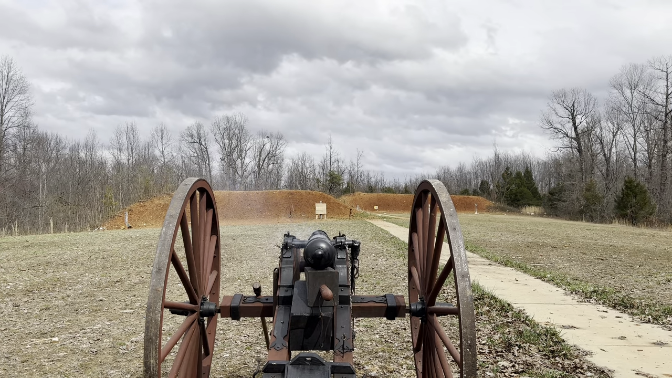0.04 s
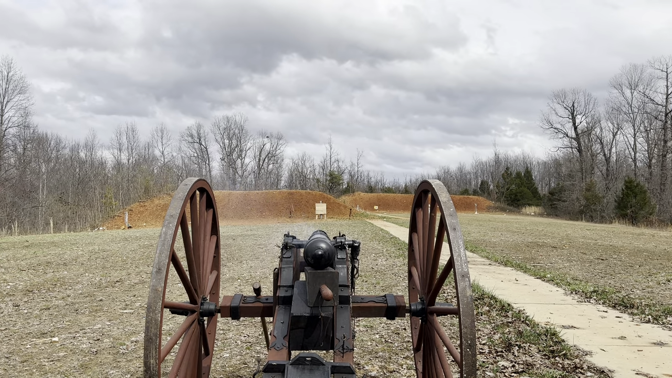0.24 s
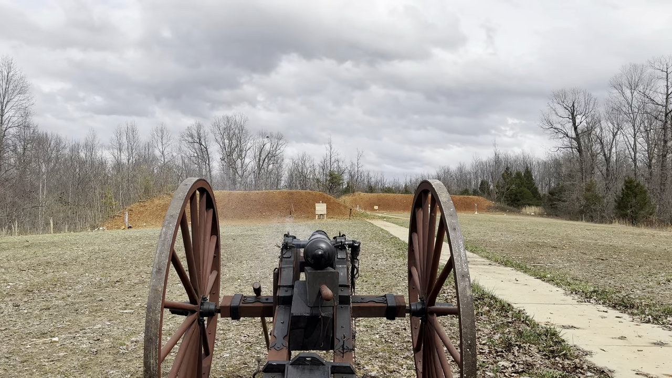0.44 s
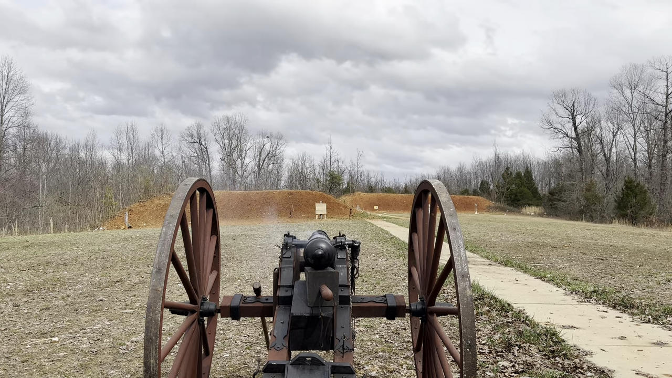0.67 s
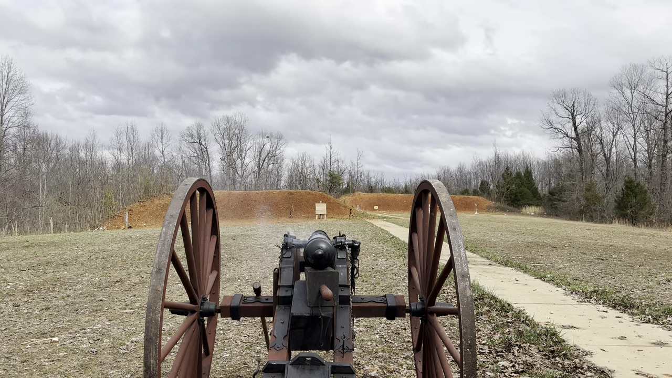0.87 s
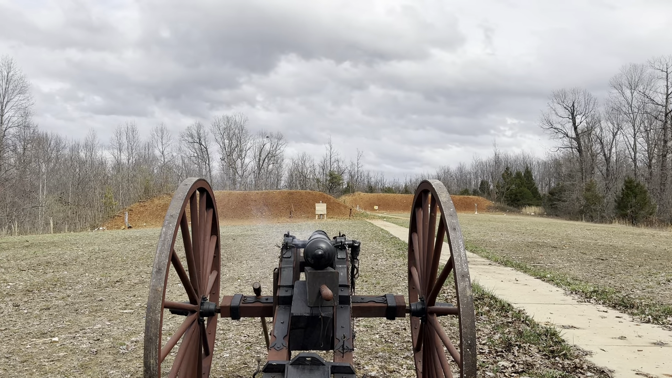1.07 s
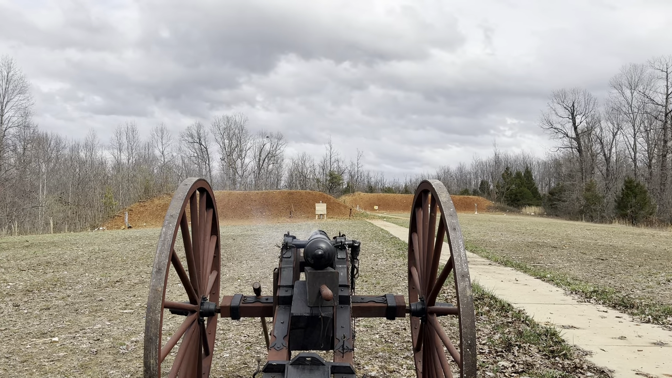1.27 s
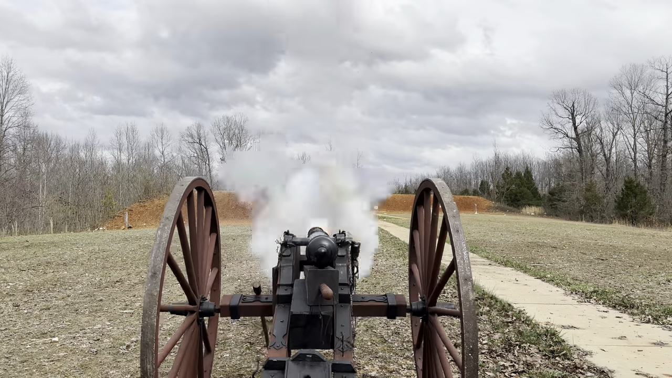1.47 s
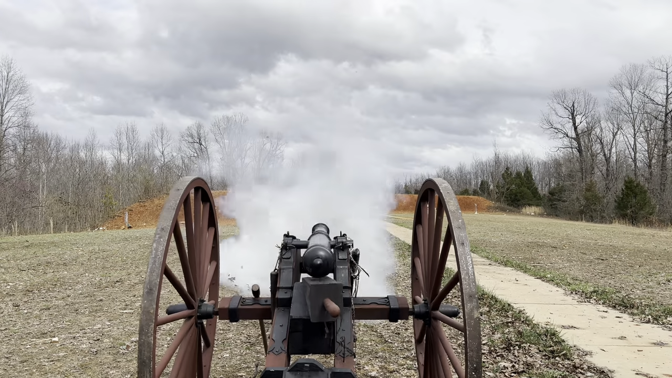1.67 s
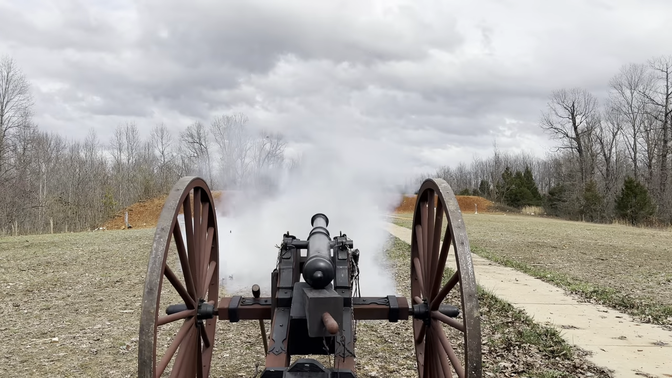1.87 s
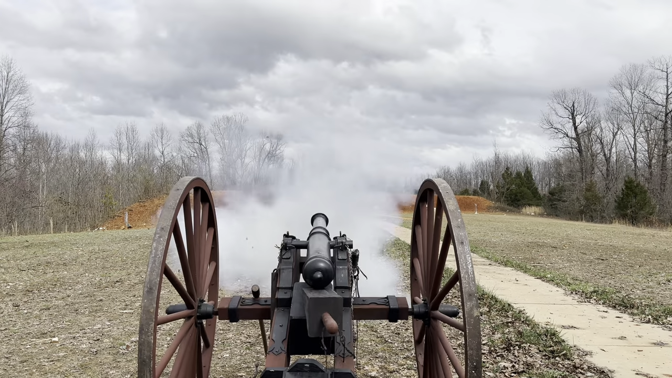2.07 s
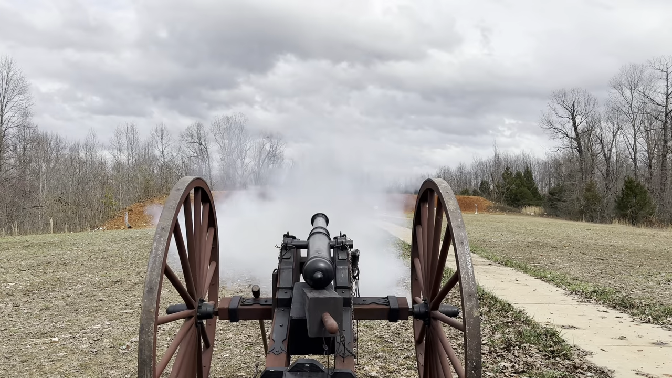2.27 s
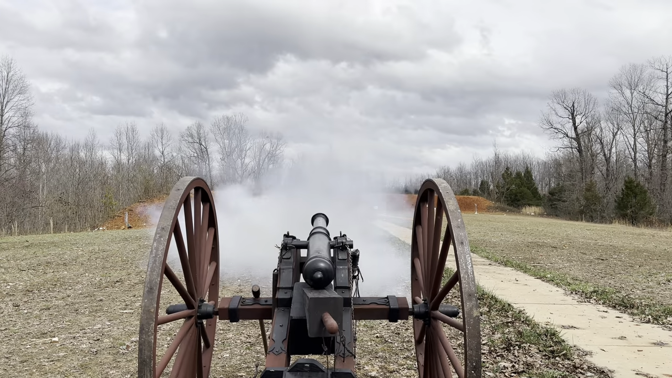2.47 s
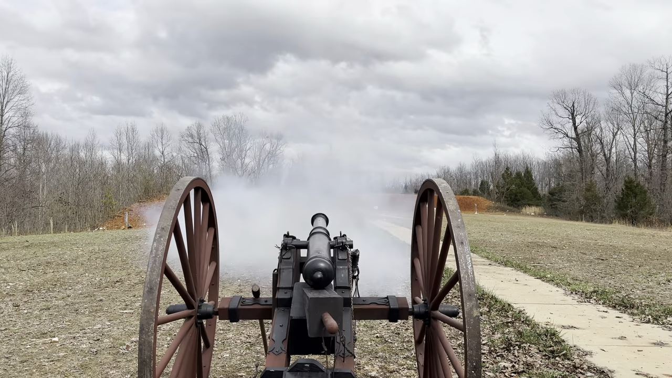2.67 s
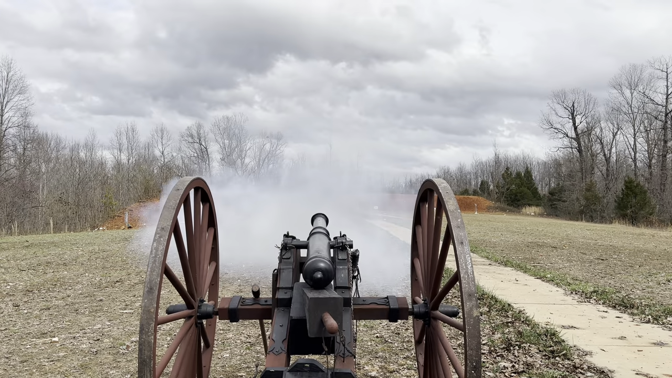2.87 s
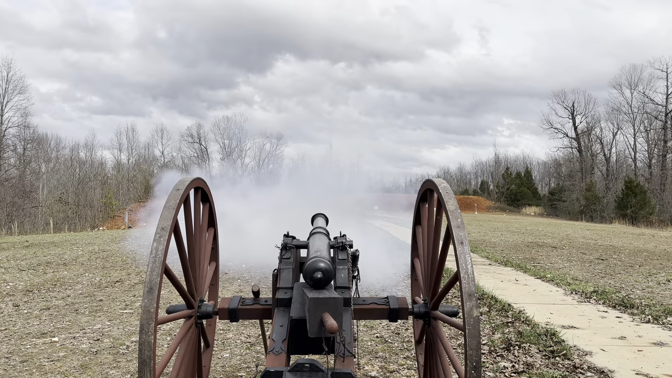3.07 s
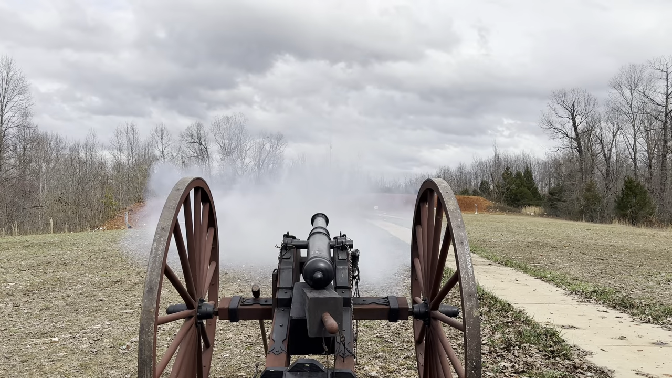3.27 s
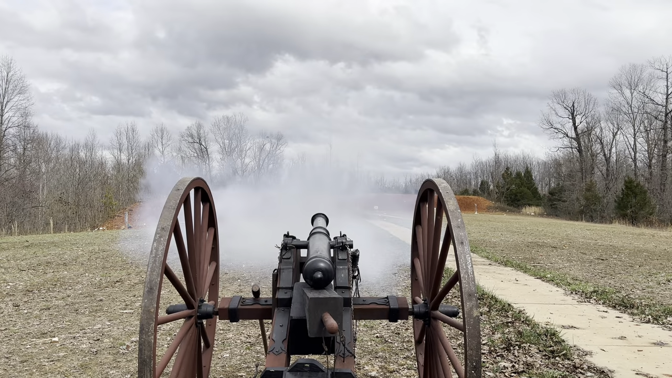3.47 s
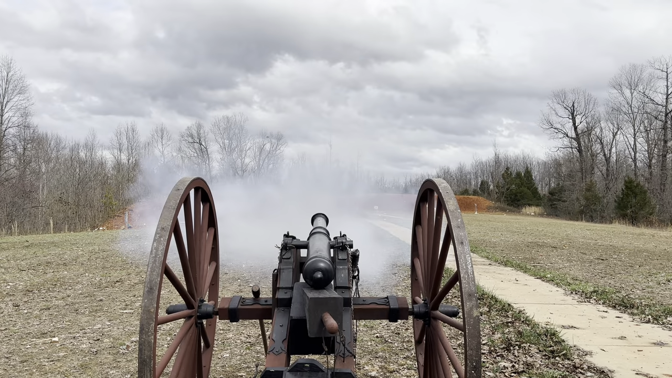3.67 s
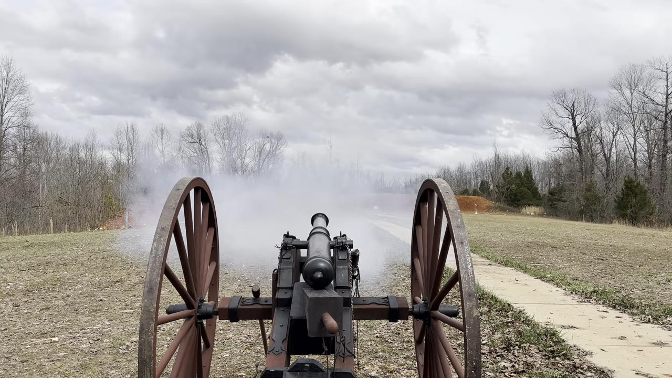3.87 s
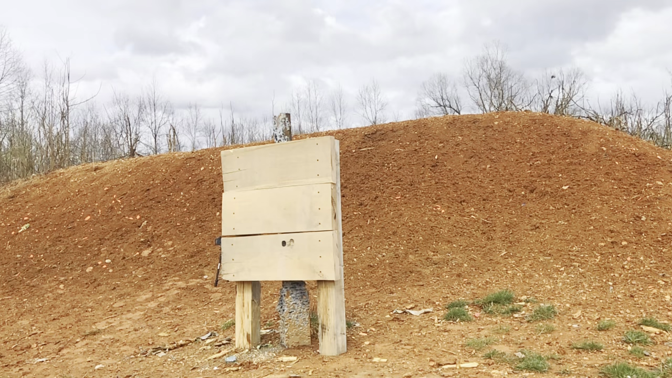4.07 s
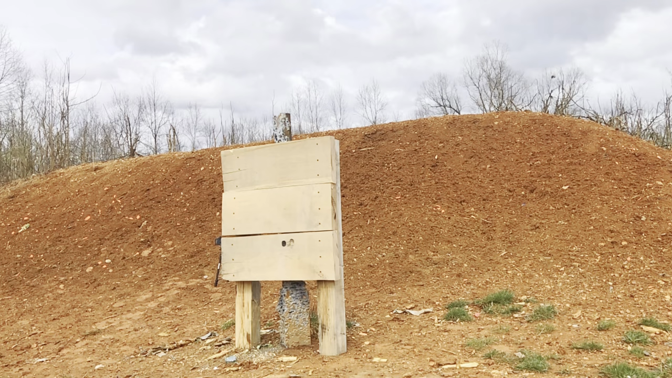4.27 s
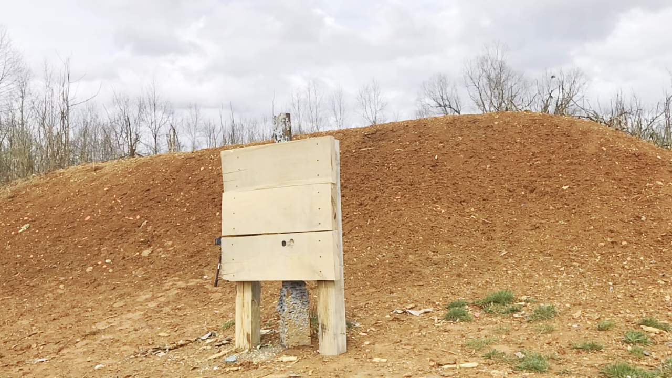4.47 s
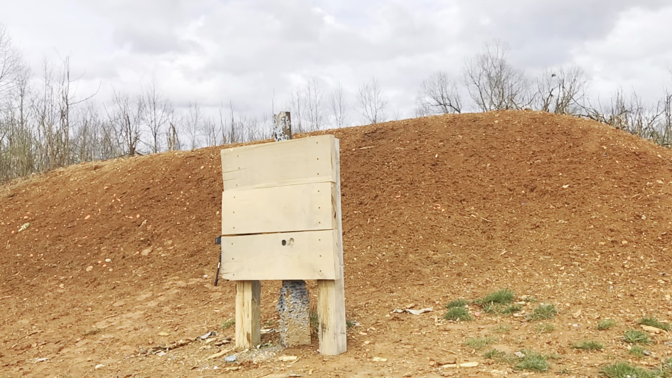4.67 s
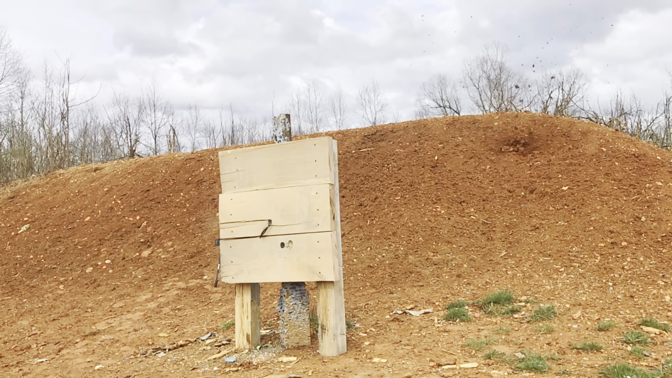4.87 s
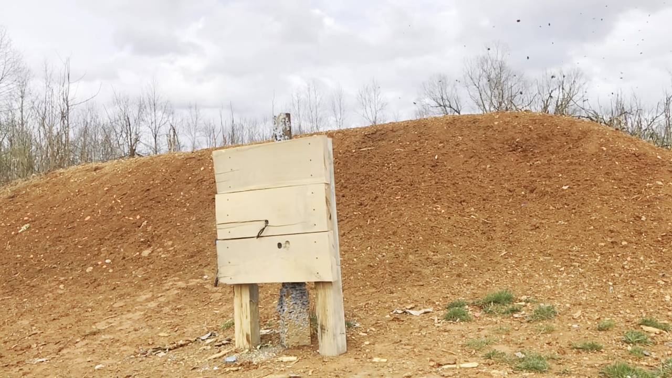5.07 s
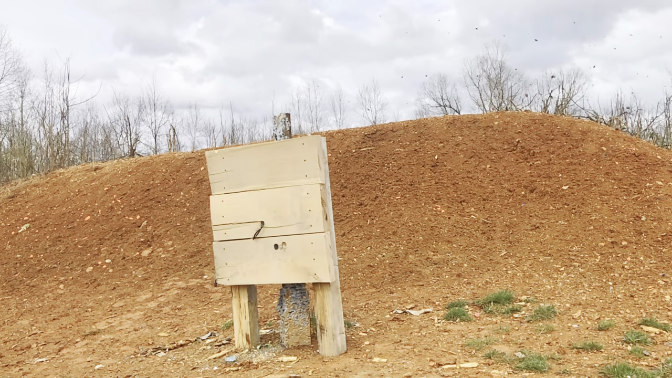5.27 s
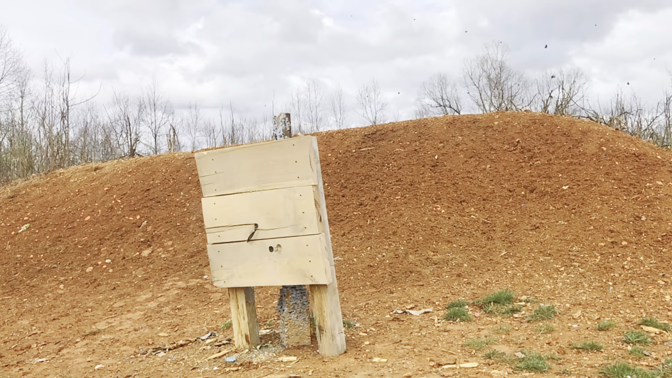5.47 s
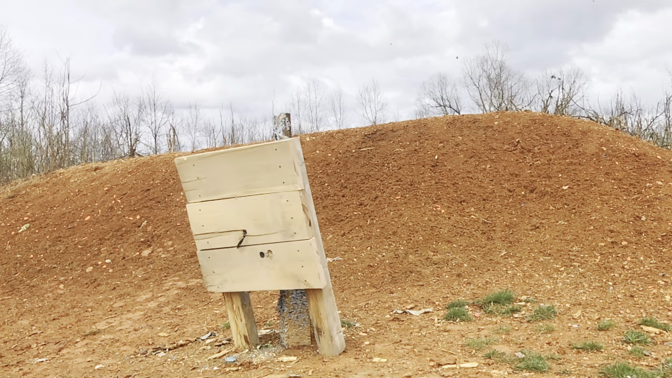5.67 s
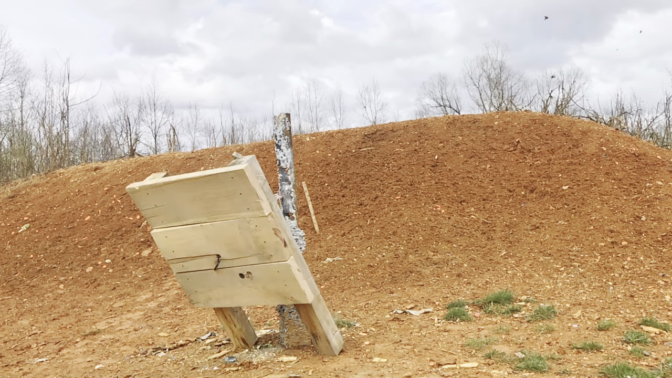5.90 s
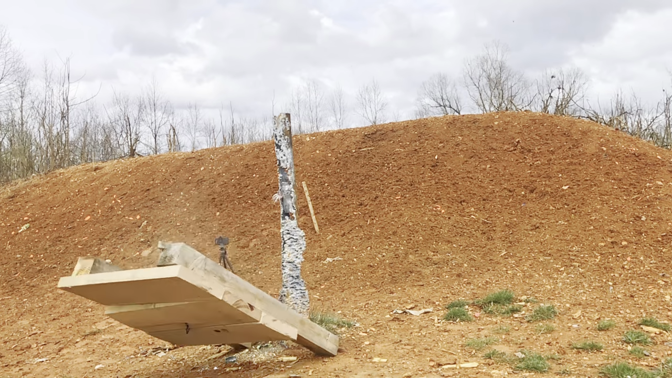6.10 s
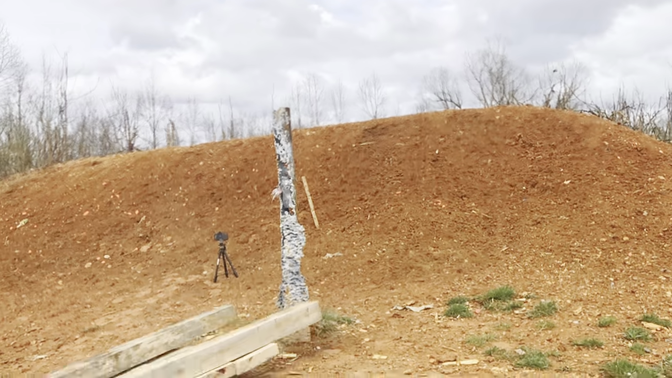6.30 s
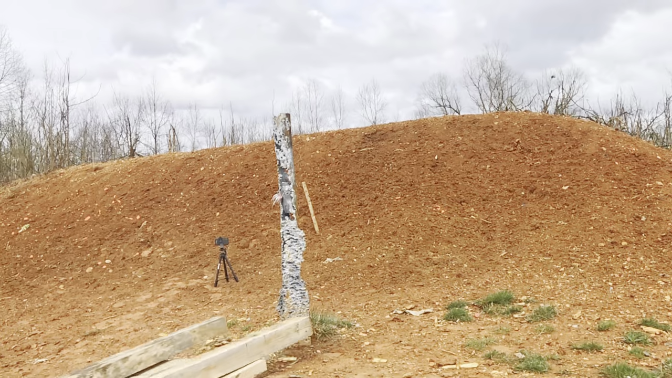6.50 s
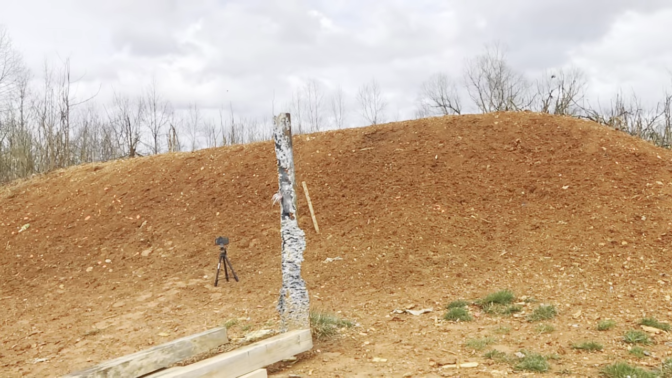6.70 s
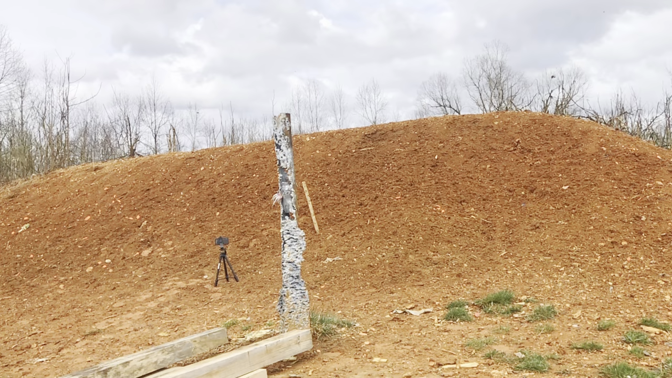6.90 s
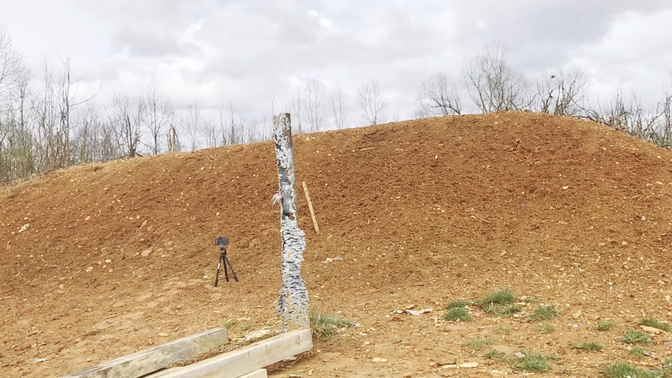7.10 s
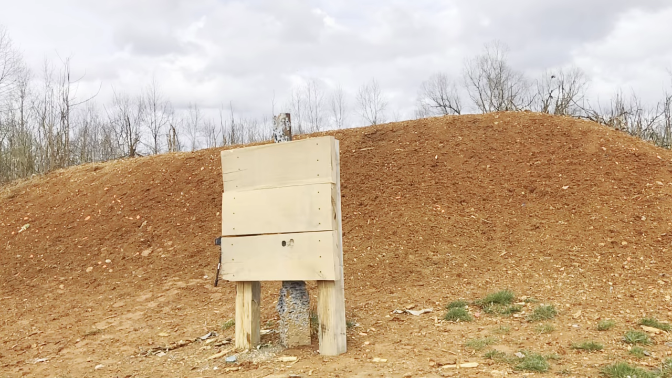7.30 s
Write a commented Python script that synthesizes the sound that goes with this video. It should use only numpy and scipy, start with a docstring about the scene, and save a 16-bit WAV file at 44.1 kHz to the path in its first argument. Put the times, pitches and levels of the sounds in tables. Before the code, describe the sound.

From 0 to 1.4 s, a stereo microphone behind a cannon in an open field catches crisp dry leaves, twig snaps, soft wind bumps and thin rising notes from a far bird around 0.2-0.4 s. At 1.41 s gas spits, and within hundredths of a second a huge, saturated blast follows, cracking then deep. Separate slaps return at about 1.67, 1.77, 1.95 and 2.2 s within a wide, rolling echo that grows duller; a weak late return comes near 3.25 s, wind bumps near 3.7. A click at 4.0 s cuts to quiet mono air beside a plank target. At 4.65 s a sharp double boom arrives, a ball hisses and whistles downward, and wood smacks loudly at 4.8. A return thumps at 5.0 and the echo fades. At 6.24-6.36 s the target crashes down in rapid wooden knocks, bouncing at 6.5-6.66. Dust and soil tick until 7.24, then faint hush.

```python
"""First, in stereo behind a black powder cannon: dry leaves and twigs underfoot, a far bird, wind.
The gun fires: puffs of gas are grainy noise, the blast is a row of dying swings, the echo is fading noise.
Then, after a click, the same shot in mono beside a plank target at an earth bank: the boom, then the ball's hiss.
The planks ring when struck and the echo fades. The target topples and bounces with more knocks,
dust and soil patter down as noise and small ticks, and a faint hush ends it."""
import sys
import numpy as np
from scipy import signal
from scipy.io import wavfile
from scipy.ndimage import uniform_filter1d

SR = 44100
rng = np.random.default_rng(int(sys.argv[2]) if len(sys.argv) > 2 else 0)


def gain_from_db(level_db):
    """Turn a decibel level (scalar or array-like) into a linear amplitude factor."""
    decades = np.asarray(level_db, float) / 20
    return 10 ** decades


def master_out(mix):
    """Clip the mix to full scale and print it as 16-bit PCM to the path in sys.argv[1]."""
    frames = np.transpose(np.atleast_2d(mix))
    ceiling = np.clip(frames, -1, 1)
    pcm = np.round(ceiling * 32767).astype(np.int16)
    wavfile.write(sys.argv[1], SR, pcm)


N = 324028
T = np.arange(N) / SR
CUT_S, END_S = 4.002, 7.24  # start of the target side, start of the last hush

# All levels are settings of the single layers, before they are mixed and rounded off.
# Colours of the noises: (pitch [Hz], level [dB])
ECHO_GUN_COLOUR = [(25, -21.5), (50, -9.5), (240, -2.5), (560, -12.5), (2100, -20), (9500, -31),
                   (15000, -47.5), (16000, -72)]
ECHO_BANK_COLOUR = [(25, -28.5), (60, -19.5), (150, 2.5), (500, -5), (1500, -11.5), (6200, -20.5),
                    (12500, -39), (16000, -58.5)]
GAS_COLOUR = [(150, -23), (400, -3.5), (1300, -0.5), (5500, -10), (16000, -25.5)]
BALL_COLOUR = [(100, -20.5), (300, 0.5), (900, -5.5), (1700, -9.5), (12200, -10), (16000, -31)]
WIND_COLOUR = [(15, -42.5), (25, -13), (55, 6), (100, -4), (170, -14.5), (420, -43), (1100, -100)]
LEAF_COLOUR = [(400, -6.5), (2400, -8.5), (6500, 2), (10000, -9.5), (16000, -22)]
FIELD_COLOUR = [(90, -18), (150, -3.5), (300, -17.5), (540, -31.5), (3400, -26), (8000, -32.5),
                (10000, -24), (16000, -37.5)]
BANK_COLOUR = [(20, -20.5), (84, 11), (230, 2), (600, -13), (1400, -21.5), (12500, -29.5), (16000, -32)]
# Stereo width of noise: (pitch [Hz], side minus mid [dB])
SIDE_DB = [(60, -9), (200, -11.5), (700, 3.5), (2380, -1.5), (8000, 1.5), (15000, -16)]

FIELD_DB, BANK_DB, HUSH_DB = -65.5, -63, -84
WIND_DB = -58.5  # the steady part
# Gusts on the microphone: (time [s], length [s], level [dB])
GUSTS = [(0.153, 0.049, -33.5), (0.218, 0.066, -40.5), (0.828, 0.16, -49), (1.199, 0.27, -58),
         (3.691, 0.1, -36), (3.78, 0.21, -43)]
# Steps in dry leaves: (time [s], length [s], crackle level [dB], heel crunch level [dB])
LEAVES = [(0, 0.085, -56.5, -69), (0.055, 0.081, -56.5, -58), (0.08, 0.44, -65, -69),
          (0.451, 0.072, -62, -62), (0.509, 0.044, -68, -64), (0.636, 0.06, -70, -66),
          (0.973, 0.21, -63, -69)]
# Twigs and pebbles under the boots; the last row is a click at the cut to the target:
# (time [s], level [dB], pitch [Hz])
SNAPS = [(0.0065, -41, 6450), (0.035, -33, 6430), (.06, -43, 830), (.089, -41, 830), (0.1325, -36, 6000),
         (0.164, -36, 7200), (.165, -45, 950), (.26, -47, 7480), (.513, -47, 1090), (.525, -40, 800),
         (3.989, -45, 6500)]
SNAP_CYCLES = 22  # cycles until a snap's ring has died by 60 dB
# Thin rising bird notes: (time [s], length [s], level [dB])
BIRD = [(.215, .028, -59), (.328, 0.029, -58), (0.362, 0.028, -65)]
BIRD_HZ, BIRD_RISE_HZ_PER_S = 5400, 12000

# Fine dust sifting down: (time [s], build-up [s], peak level [dB], time to fall 60 dB [s])
DUST = [(6.25, 0.026, -61.5, 0.28), (6.46, 0.037, -61.5, .15), (6.85, .01, -79, 2.2)]
# Loudest clods and splinters landing: (time [s], level [dB], pitch [Hz], time for the ring to fall 60 dB [s])
PATTER = [(6.4406, -51, 3300, .01), (6.564, -29, 3000, .012), (6.5655, -38, 1270, .07),
          (6.674, -46, 3500, .025), (6.7134, -46, 3202, .015), (6.76, -40, 6800, .01),
          (6.852, -46, 3420, .08), (6.8875, -40, 6700, .01), (6.9454, -45, 7000, .004),
          (7.0745, -53, 4300, .01), (7.1465, -52, 5100, .01), (7.1705, -53, 3600, .008)]
GRIT_FROM_S, GRIT_DB = 6.4, -57  # start of the small grains, level of the loudest

# Echo off tree lines and bank:
# (arrival time [s], build-up [s], peak level at 150-500 Hz [dB], time to fall 60 dB [s])
RETURNS_GUN = [(1.47, 0.61, -38, 2.8), (1.61, 0.16, -30.5, 2.8), (1.85, 0.39, -37, 0.37),
               (3.2, 0.056, -50.5, 2.3)]
RETURNS_BANK = [(4.77, .12, -31.5, 0.85), (5.06, 0.076, -45.5, 3.4), (6.22, 0.21, -51, 3.7),
                (6.5, 0.29, -54, 2.5)]
DULLING_GUN_S, DULLING_BANK_S = 1.611, 4.756  # when the echo's treble starts to fade at either microphone
# At 2.5 kHz: extra treble before it fades, then treble lost after one second of fading
FRESH_DB, AIR_GUN_DB, AIR_BANK_DB = 3, 13, 9
AIR_POWER = 0.69  # how the loss grows with time

# Pre-echo, a thin 3 kHz tone smeared ahead of the boom: (start time [s], end time [s], last level [dB])
PRE_ECHOES = [(4.643, 4.669, -16)]
PRE_ECHO_HZ, PRE_ECHO_RISE_DB_PER_S = 3050, 1800
# Ball in flight, nearing the target: (time [s], hiss level [dB])
BALL = [(4.675, -42), (4.69, -34.5), (4.698, -40), (4.712, -26), (4.745, -28), (4.765, -21.5),
        (4.783, -35.5), (4.795, -22.5), (4.803, -42.5)]
# Whistle in its wake: (time [s], pitch [Hz], level [dB])
WHISTLE = [(4.752, 8020, -45), (4.764, 6980, -22.5), (4.777, 4160, -21), (4.783, 3190, -44)]
# Planks struck by the ball, then by the ground:
# (time [s], peak level [dB], contact [ms], crack level [dB])
KNOCKS = [(4.7954, -5, 0.12, -11), (6.2395, -30, 0.35, -36), (6.257, -30, .3, -34), (6.2615, -20, 0.2, -30),
          (6.266, -15, 0.96, -23.5), (6.279, -7, 0.28, -21.5), (6.291, -21, 1.53, -50),
          (6.312, -22.5, 0.67, -57), (6.357, -37.5, 0.14, -43.5), (6.519, -36, 2, -53),
          (6.585, -30, 0.4, -35), (6.590, -22, 1.2, -48), (6.661, -36, .5, -59.5)]
# Ringing modes of the planks: (pitch [Hz], level [dB], time to fall 60 dB before extra damping [s])
PLANK = [(64.4, -5, 0.6), (162, -4, 0.095), (230, 1.5, .13), (340, -10.5, .06), (514, -4, 0.044),
         (853, 4, 0.053), (1250, -0.5, .04), (1710, -5, 0.013)]
PLANK_DAMP_T60_S = 0.14  # soil and joints damp a 1 ms blow this fast; shorter contacts die sooner

# Puffs of gas out of vent and muzzle: (time [s], build-up [s], peak level [dB], time to fall 60 dB [s])
PUFFS = [(1.409, .03, -23.5, 0.067), (1.4145, .0095, -14, 0.012), (1.423, .0073, -18, 0.032),
         (1.439, .05, -23.5, .14)]
# Pressure pulses, shot and single echoes:
# (time [s], swing level [dB], first pitch [Hz], last pitch [Hz], crack level [dB])
BOOMS = [(1.4168, 0.5, 290, 205, -18), (1.427, -10, 1291, 351, -4.5), (1.433, -5.5, 397, 140.7, -26),
         (1.449, -11, 1500, 800, -21.5), (1.45, -3.5, 80, 57, -41.5), (1.665, -16.5, 400, 200, -41.5),
         (1.77, -35, 1500, 600, -14), (1.773, -13.5, 420, 231, -60), (1.936, -17, 500, 200, -60),
         (1.953, -16, 500, 230, -60), (2.215, -20, 500, 200, -70), (3.244, -33.5, 500, 200, -80),
         (3.253, -26, 1600, 700, -90), (3.255, -24, 800, 270, -90), (3.268, -36, 1600, 1100, -90),
         (4.646, -18, 813, 392, -40.5), (4.656, -21.5, 597, 248.4, -43.5), (4.660, -7.5, 450, 190, -34.5),
         (4.668, -2, 1530, 383, -3.5), (4.6736, -3, 497, 95, -10), (4.994, -12.5, 400, 220, -60)]
# A pulse that ends at 200 Hz falls 60 dB in this time; lower ones ring longer
BOOM_GUN_T60_S, BOOM_BANK_T60_S, BOOM_T60_POWER = .055, .045, .5


def curve(rows, t=T):
    """Columns of a table along t, and where t lies inside the table."""
    s, *columns = np.transpose(rows)
    return [np.interp(t, s, c) for c in columns], (t >= s[0]) & (t <= s[-1])


def colour(points, hz):
    """Level in dB of a noise colour at each pitch."""
    f, db = np.transpose(points)
    return np.interp(np.log(hz + 1), np.log(f), db)


def walk(rate):
    """A slow random wander around 0, spread near 1; rate is new values per second."""
    k = int(SR / rate)
    steps = np.repeat(rng.standard_normal(N // k + 1), k)
    return 1.6 * uniform_filter1d(steps, k)[:N]


def noise(points, band=(0, SR), treble=None, slope=0.93, wide=True, grain=0.):
    """Noise of a colour, rms 1 in band; treble rows (time [s], level at 2.5 kHz [dB]) dull it as air does."""
    # a larger grain makes single samples stick out more
    spikes = gain_from_db(grain * np.minimum(rng.exponential(size=N), 6))
    white = rng.standard_normal((2, N)) * spikes
    hz, t, z = signal.stft(white / white.std(), SR, nperseg=1024)
    gain = gain_from_db(colour(points, hz))
    in_band = (hz >= band[0]) & (hz < band[1])
    gain = gain[:, None] / np.sqrt(np.sum(gain[in_band] ** 2) / len(hz))
    if treble is not None:
        # the higher the pitch, the stronger the change
        gain = gain * gain_from_db(np.outer((hz / 2500) ** slope, curve(treble, t)[0][0]))
    side_gain = gain_from_db(colour(SIDE_DB, hz))[:, None] * wide
    mid_side_gain = np.array([np.ones_like(side_gain), side_gain])
    mid, side = signal.istft(z * gain * mid_side_gain, SR)[1][:, :N]
    return np.array([mid + side, mid - side])


def band_noise(lo_hz, hi_hz, size, wide=0., order=2):
    """Two channels of noise between two pitches, rms 1 over both."""
    mid, side = rng.standard_normal((2, size))
    edges = np.clip([lo_hz, hi_hz], 30, .45 * SR)
    band = signal.butter(order, edges, "band", fs=SR, output="sos")
    x = signal.sosfilt(band, mid + wide * side * np.array([[1], [-1]]))
    return x / x.std()


def add(out, s, x):
    """Mix x in from time s."""
    i = int(s * SR)
    out[..., i:i + x.shape[-1]] += x[..., :N - i]


def swells(rows):
    """Gain that rises fast and dies away for each (time [s], length [s], level [dB])."""
    out = np.zeros(N)
    for s, length, db in rows:
        x = np.linspace(0, 1, int(length * SR))
        add(out, s, gain_from_db(db) * np.sin(np.pi * x ** 0.45) ** 0.87)
    return out


def fronts(rows):
    """Gain of sounds that build up and die away, their powers added."""
    power = np.zeros(N)
    for s, rise_s, db, t60 in rows:
        age = T[:int(t60 * SR)]
        shape = (1 - np.exp(-age / rise_s)) * 1000. ** (-age / t60)
        add(power, s, (gain_from_db(db) * shape / shape.max()) ** 2)
    return np.sqrt(power)


def crack(db, ms, hz=5000., wide=0.):
    """A burst of bright noise around hz that dies away within a few ms."""
    t = np.arange(1024) / SR
    return gain_from_db(db - 6) * band_noise(hz / 3, hz * 2, len(t), wide) * np.exp(-t * 1000 / ms)


def chip(db, hz, t60, wide=0.):
    """A small hard thing struck: a tick around its pitch and a short, slightly wavering ring."""
    t = T[:SR // 10]
    tick = band_noise(hz / 1.9, hz * 1.8, len(t), wide) * np.exp(-t / .0016)
    waver = np.cumsum(rng.standard_normal(len(t))) * .13
    ring = np.sin(2 * np.pi * hz * t + waver) * 1000. ** (-t / t60)
    return gain_from_db(db - 6) * (tick + ring)


def last_hush():
    """Very faint steady noise with the colour of the air at the bank."""
    return noise(BANK_COLOUR, wide=False) * gain_from_db(HUSH_DB)


def still_air():
    """Quiet noise beside the target, its level wandering slightly."""
    return noise(BANK_COLOUR, wide=False) * gain_from_db(BANK_DB + 0.42 * walk(4.7))


def open_field():
    """Faint hiss of the field, heard only before the shot."""
    return noise(FIELD_COLOUR) * gain_from_db(FIELD_DB) * (T < PUFFS[0][0])


def wind():
    """Low noise of wind on the microphone: a steady part and gusts, both unsteady."""
    gusts = uniform_filter1d(swells(GUSTS), size=400)
    return noise(WIND_COLOUR) * (gain_from_db(WIND_DB) + gusts) * gain_from_db(1.6 * walk(25))


def bird():
    """A far bird: short pure tones that rise in pitch."""
    out = np.zeros((2, N))
    for s, length, db in BIRD:
        t = T[:int(length * SR)]
        cycles = (BIRD_HZ + BIRD_RISE_HZ_PER_S * t / 2) * t
        add(out, s, gain_from_db(db) * np.hanning(len(t)) * np.sin(2 * np.pi * cycles))
    return out


def leaves():
    """Steps in dry leaves: spiky noise for the crackle, lower noise for the heel's crunch."""
    crackle = noise(LEAF_COLOUR, grain=3.9) * swells([row[:3] for row in LEAVES])
    heel_gain = swells([(s, length, db) for s, length, _, db in LEAVES])
    heel = band_noise(520, 1420, N, 0.87) * heel_gain
    return (crackle + heel) * gain_from_db(1.7 * walk(90))


def snaps():
    """Twigs and pebbles under the boots, then a click at the cut: ticks that ring for a set number of cycles."""
    out = np.zeros((2, N))
    for s, db, hz in SNAPS:
        add(out, s, chip(db, hz, SNAP_CYCLES / hz, wide=.8))
    return out


def falling_soil():
    """Dust is flickering, spiky noise; clods, splinters and random grains are single ticks."""
    out = fronts(DUST) * noise(LEAF_COLOUR, wide=False, grain=3.5) * gain_from_db(2.5 * walk(150))
    for s, db, hz, t60 in PATTER:
        add(out, s, chip(db, hz, t60))
    for when, size, pitch in rng.random((40, 3)):
        s = END_S - (END_S - GRIT_FROM_S) * when
        add(out, s, chip(GRIT_DB - 12 * size, 2200 + 5000 * pitch, .01))
    return out


def echo(rows, points, wide, dulling_s, air_db):
    """Countless scattered returns; the later they come, the more air has eaten their treble."""
    age = np.linspace(0, 3, 30)
    treble_db = FRESH_DB - air_db * age ** AIR_POWER
    returns = noise(points, (150, 500), list(zip(dulling_s + age, treble_db)), wide=wide)
    low = signal.sosfilt(signal.butter(1, 500, fs=SR, output="sos"), returns)
    # the low returns arrive in lumps
    lumps = gain_from_db(2.3 * walk(45))
    return (returns + low * (lumps - 1)) * fronts(rows)


def pre_echo():
    """A pre-echo: a thin 3 kHz tone, slightly wavering, smeared ahead of the boom."""
    out, waver = np.zeros((2, N)), walk(300)
    for start, end, db in PRE_ECHOES:
        left = T[:int((end - start) * SR)][::-1]  # seconds still to go
        phase = 2 * np.pi * PRE_ECHO_HZ * left + waver[int(start * SR):][:len(left)]
        add(out, start, gain_from_db(db - PRE_ECHO_RISE_DB_PER_S * left) * np.sin(phase))
    return out


def ball():
    """The ball's hiss is noise of changing level; its whistle falls in pitch as it goes by."""
    (hiss_db,), flying = curve(BALL)
    hiss = flying * noise(BALL_COLOUR, wide=False, grain=0.48) * gain_from_db(hiss_db)
    (hz, db), whistling = curve(WHISTLE)
    tone = np.sin(2 * np.pi * np.cumsum(hz) / SR)
    return hiss + whistling * gain_from_db(db) * tone * walk(2800)


def planks():
    """Every blow rings the same plank modes and rattles the joints; a longer contact is duller."""
    out, t = np.zeros((2, N)), np.arange(SR // 5) / SR
    chances = rng.standard_normal((len(KNOCKS), 2, len(PLANK)))
    for (s, db, ms, crack_db), chance in zip(KNOCKS, chances):
        ring = np.zeros(len(t))
        damp_s = PLANK_DAMP_T60_S * ms ** 0.76
        for (hz, mode_db, t60), level_chance, pitch_chance in zip(PLANK, *chance):
            tone = np.sin(2 * np.pi * hz * (1 + pitch_chance / 20) * t)
            # bending waves spread: the low modes build up later
            shape = 1000. ** (-t / t60 - t / damp_s) * (1 - np.exp(-t * hz / 2))
            ring += gain_from_db(mode_db + 2 * level_chance) * tone * shape
        rattle = band_noise(140, 1900, len(t))[0] * 1000. ** (-t / (0.18 * ms ** .5))
        # the first wave through the boards falls in pitch
        sweep_phase = 2 * np.pi * np.cumsum(130 + 900 * np.exp(-t / .003)) / SR / ms ** .5
        sweep = np.sin(sweep_phase) * 1000. ** (-t / (.05 * ms ** .5)) * (1 - np.exp(-t / 0.0015))
        blow = ring / np.abs(ring).max() + gain_from_db(-8.0) * rattle + gain_from_db(2.5) * sweep
        push = np.hanning(int(ms * SR / 500) + 3)  # smooths the blow over the contact
        blow = np.convolve(blow, push)[:len(t)]
        # a quick light blow does not move the whole frame
        blow = signal.sosfilt(signal.butter(2, 60 / ms, "high", fs=SR, output="sos"), blow)
        add(out, s, gain_from_db(db) * blow / np.abs(blow).max())
        add(out, s, crack(crack_db, 3.6 * ms ** 0.24, 4300.))
    return out


def gas():
    """Gas rushing out of vent and muzzle: spiky noise in short puffs."""
    return noise(GAS_COLOUR, grain=3.6) * fronts(PUFFS)


def booms():
    """Each pulse is a front whose swings lengthen as it dies, with scatter off ground and grass behind it."""
    out, t = np.zeros((2, N)), np.arange(SR // 5) / SR
    for s, db, first_hz, last_hz, crack_db in BOOMS:
        wide = .5 * (s < CUT_S)
        t60 = BOOM_GUN_T60_S if s < CUT_S else BOOM_BANK_T60_S
        t60 = t60 * (200 / last_hz) ** BOOM_T60_POWER
        hz = last_hz + (first_hz - last_hz) * np.exp(-t * last_hz / .45)
        swing = np.sin(2 * np.pi * np.cumsum(hz) / SR) * 1000. ** (-t / t60)
        swing = swing * (1 - np.exp(-t * first_hz * 2.5)) ** 2
        scatter = band_noise(last_hz / 2, first_hz, len(t), wide, order=4)
        scatter = scatter * 1000. ** (-t / (2 * t60)) * (1 - np.exp(-t / 0.0015))
        add(out, s, gain_from_db(db) * (swing + gain_from_db(-11.5) * scatter))
        # steeper fronts crack higher
        add(out, s, crack(crack_db, 1.1, 4.5 * first_hz, wide))
    return out


def gun_side():
    """All that is heard behind the gun, except the booms."""
    out = open_field() + wind() + bird() + leaves() + snaps()
    return out + echo(RETURNS_GUN, ECHO_GUN_COLOUR, True, DULLING_GUN_S, AIR_GUN_DB) + gas()


def bank_side():
    """All that is heard beside the target, except the booms."""
    out = still_air() + falling_soil()
    out += echo(RETURNS_BANK, ECHO_BANK_COLOUR, False, DULLING_BANK_S, AIR_BANK_DB)
    return out + pre_echo() + ball() + planks()


def scene():
    """Gun side leaning left, cut to the target side, then a last hush."""
    shot = booms()
    lean_db = np.array([[.9], [-.9]])  # left, right
    # each cut is a blend of about 3 ms
    first = uniform_filter1d(1. * (T < CUT_S), size=130)
    last = uniform_filter1d(1. * (T >= END_S), size=130)
    gun = first * (gun_side() + shot) * gain_from_db(lean_db)
    bank = (1 - first - last) * (bank_side() + shot)
    return gun + bank + last * last_hush()


def low_pass(x):
    """Removes everything above the highest recorded frequency."""
    return signal.sosfilt(signal.butter(12, 16860, fs=SR, output="sos"), x)


def record(dry):
    """Each microphone drops the deepest bass and rounds off the loudest swings."""
    top = np.where(T < CUT_S, .93, .72)  # highest swing, gun side and then target side
    dry = signal.sosfilt(signal.butter(2, 30, "high", fs=SR, output="sos"), dry)
    mix = top * np.tanh(dry / top)
    return low_pass(mix)


dry = scene()
out = record(dry)
master_out(out)
```